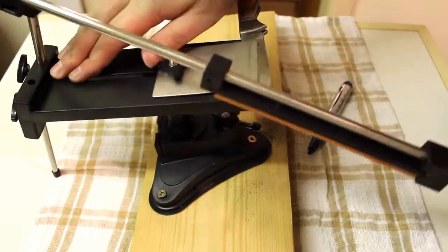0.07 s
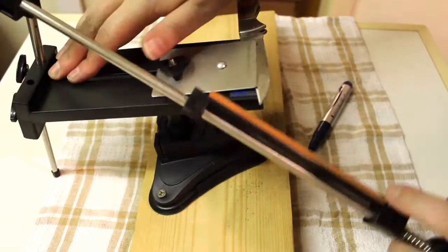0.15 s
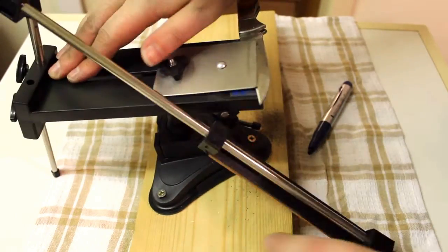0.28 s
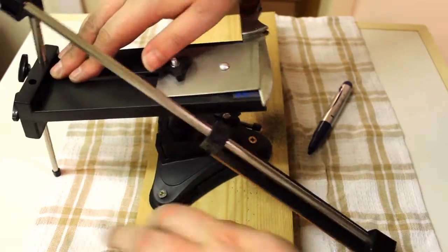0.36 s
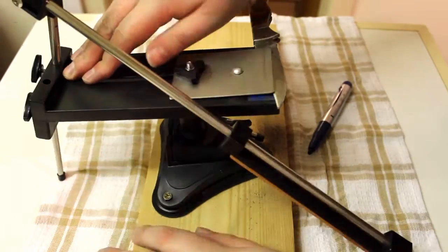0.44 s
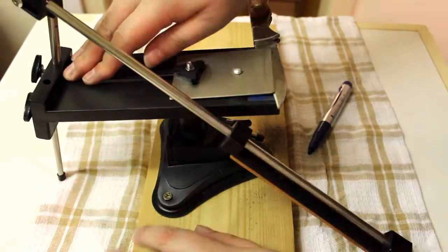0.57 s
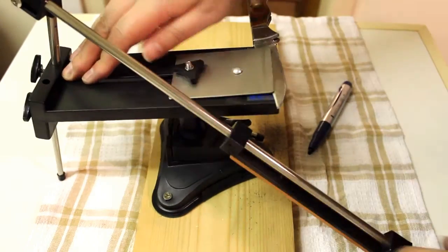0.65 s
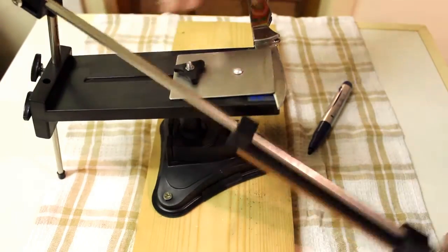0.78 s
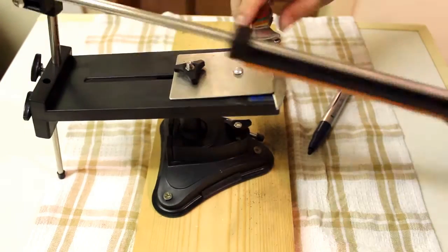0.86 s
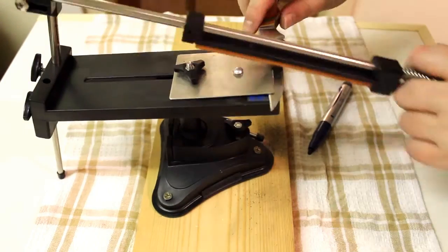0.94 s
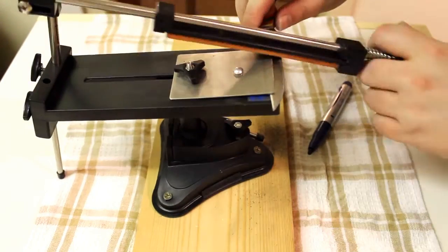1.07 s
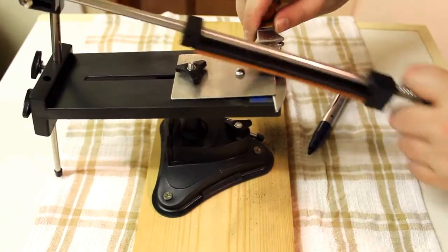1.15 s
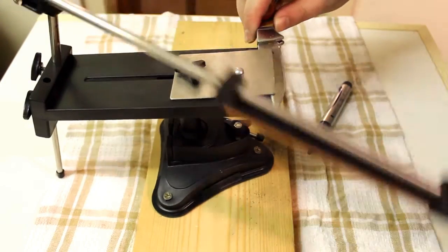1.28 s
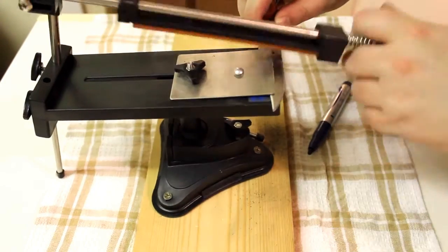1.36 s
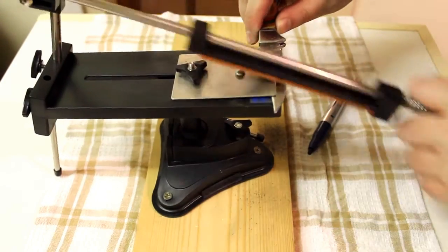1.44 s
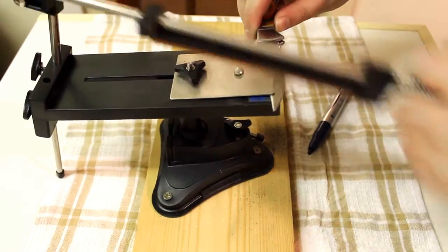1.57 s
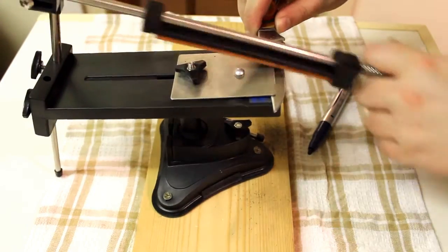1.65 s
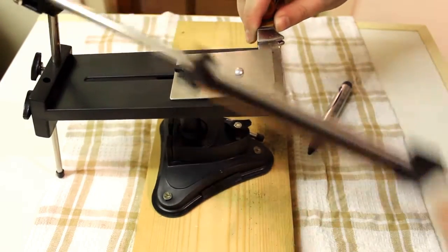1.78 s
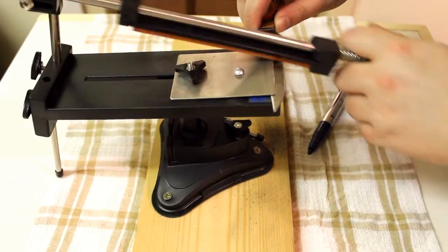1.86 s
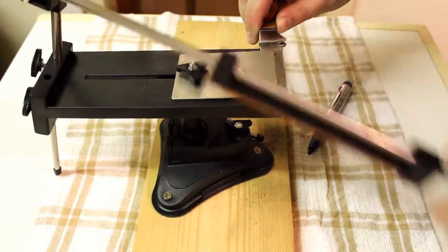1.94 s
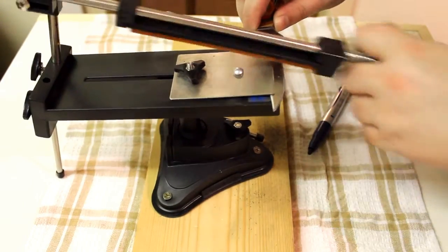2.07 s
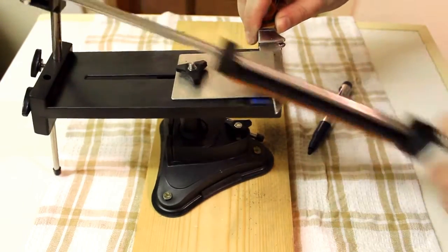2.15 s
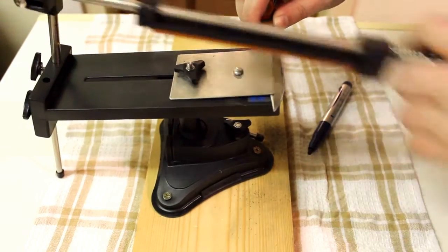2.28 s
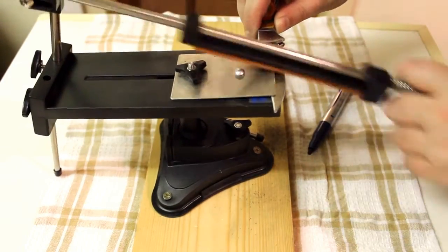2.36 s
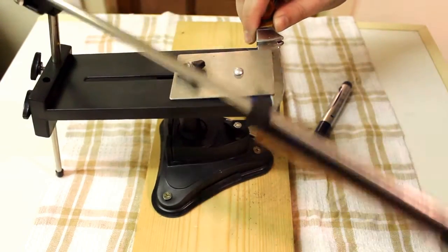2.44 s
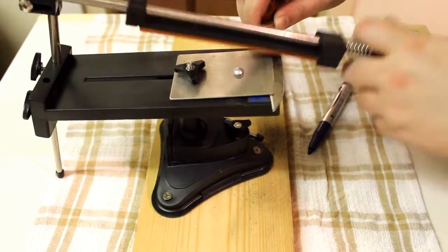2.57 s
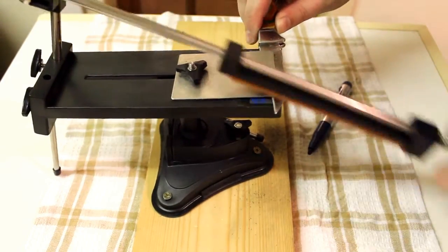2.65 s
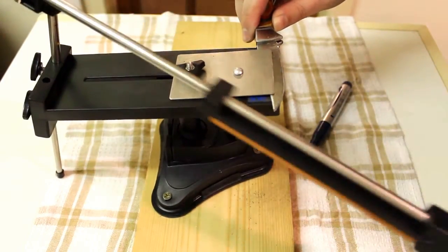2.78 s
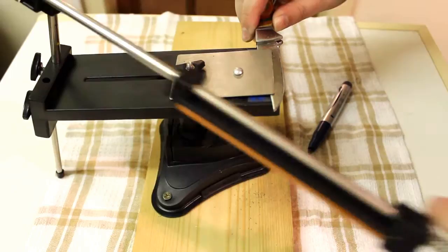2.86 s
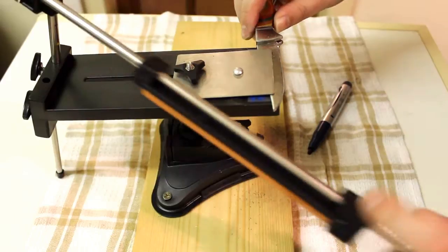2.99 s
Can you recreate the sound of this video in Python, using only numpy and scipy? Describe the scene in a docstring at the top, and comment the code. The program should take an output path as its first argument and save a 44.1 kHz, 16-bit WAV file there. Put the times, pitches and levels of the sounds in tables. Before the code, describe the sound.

Stone scraping on a knife, heard close in a small room, sped up over a faint steady hum around 600 Hz. Light knocks from 0.1 s, a very loud dry clack at 0.28 s, a tick at 0.47 s, then near quiet. From 0.84 s quick hissing strokes, about nine a second, grow stronger with bright ticks and faint squeaky groans. At 2.75 s a slower, duller rasp fades; the hum drops low.

```python
"""Stone dragged along a clamped knife

A stone on a guide rod is dragged to and fro along a clamped knife in a small room, over a steady hum.
Blows excite decaying modes of blade, rod, stand and plate; grit is a train of random grains; the rod
groans as a tone with its octave; the appliance hum is sines, sounded at four times their frequencies.
Near the end a cross-fade leads to normal speed: the hum drops two octaves, the scrape turns dull and slow."""
import sys
import numpy as np
from scipy import signal
from scipy.fft import rfft, irfft
from scipy.io import wavfile
from scipy.ndimage import uniform_filter1d

SR = 44100
rng = np.random.default_rng(int(sys.argv[2]) if len(sys.argv) > 2 else 0)


def to_linear_factor(level_db):
    """Convert decibel levels (scalar or array-like) to linear amplitude factors."""
    exponent = np.asarray(level_db, float) / 20
    return 10 ** exponent


def master(y):
    """Save y as 16-bit WAV."""
    cut = np.clip(np.atleast_2d(y).T, -1, 1)
    pcm = np.round(cut * 32767)  # scale
    wavfile.write(sys.argv[1], SR, pcm.astype(np.int16))


N = 134505
T = np.arange(N) / SR  # [s]

# modes of the stand: (frequency [Hz], relative level [dB])
STAND_MODES = [(225, 8.5), (470, -4), (705, -6), (915, -4.5), (1070, -5.5), (1320, -8.5)]
# modes of the guide rod: (frequency [Hz], relative level [dB])
ROD_MODES = [(2930, -1), (3500, 9), (3950, 16.5), (4400, 13), (5330, 5)]
ROD_T60 = 0.012  # [s]
# spectral density of the slow scrape and its room air: (frequency [Hz], relative density [dB per Hz])
SLOW_SPECTRUM = [(40, -11), (230, -1), (400, -11.5), (1500, -15.5), (3000, -2.5), (7500, -13), (9500, -33),
                 (14500, -45), (16000, -57)]
FAST_END_S = 2.799  # end of the fast part and of its last stroke


def evened(x):
    """Normalisation: scales a signal to rms 1."""
    return x / np.sqrt(np.mean(x ** 2) + 1e-20)


def read(points, hz):
    """Interpolation: reads a spectrum in dB along a logarithmic frequency axis."""
    f, value = np.transpose(points)
    return np.interp(np.log(hz + 1), np.log(f + 1), value)


def add(mix, s, sound):
    """Superposition: sums a sound into the mix from time s [s]."""
    part = mix[round(s * SR):][:len(sound)]
    part += sound[:len(part)]


def colour(x, spectrum):
    """Linear filtering: weights the Fourier spectrum by a curve in dB, then sets rms 1."""
    gain = to_linear_factor(read(spectrum, np.fft.rfftfreq(len(x), 1 / SR)))
    return evened(irfft(rfft(x) * gain, len(x)))


def filtered(x, order, hz, kind):
    """Linear filtering: passes a signal through a Butterworth filter."""
    return signal.sosfilt(signal.butter(order, hz, kind, fs=SR, output="sos"), x)


def wander(rate_hz):
    """Random modulation: low-passed Gaussian noise of rms 1."""
    return colour(rng.standard_normal(N), [(rate_hz, 0), (3 * rate_hz, -30), (30 * rate_hz, -90)])


def lasting(modes, t60):
    """Modal damping: gives every mode the same 60 dB decay time [s]."""
    return [(hz, db, t60) for hz, db in modes]


def ring(modes, scatter_db, detune, size=6000):
    """Modal impulse response: sums decaying sines, with random spread in level and relative pitch."""
    t = np.arange(size)[:, None] / SR
    hz, db, t60 = np.transpose(modes)
    level_chance, pitch_chance = rng.standard_normal((len(modes), 2)).T
    decay = to_linear_factor(db + scatter_db * level_chance - 60 * t / t60)
    return (decay * np.sin(2 * np.pi * hz * (1 + detune * pitch_chance) * t)).sum(1)


def resonated(x, modes):
    """Resonance: drives fixed modes with a signal by convolution, then sets rms 1."""
    return evened(signal.fftconvolve(x, ring(modes, 0, 0))[:N])


def grains(per_s, spread_db):
    """Shot noise: independent random impulses at a mean rate, of widely spread strength."""
    spread = to_linear_factor(spread_db * np.minimum(rng.exponential(1, N), 4))
    return rng.standard_normal(N) * spread * (rng.random(N) < per_s / SR)


def hum(speed, more_waver_db):
    """Amplitude modulation: steady sines, scaled in pitch by speed, waver randomly in level."""
    # lines at speed 1: (frequency [Hz], rms level without waver [dB], rms waver before the extra [dB])
    lines = [(47, -65, 1.5), (147.15, -41.8, 2.0), (153.4, -56, 1.5)]
    out = np.zeros(N)
    for hz, db, waver_db in lines:
        level = to_linear_factor(db + (waver_db + more_waver_db) * wander(17.0 * speed))
        out += np.sqrt(2) * level * np.sin(2 * np.pi * (hz * speed * T + rng.random()))
    return out


def room_air():
    """Broadband noise: Gaussian noise with a fixed spectral density."""
    # (frequency [Hz], relative density [dB per Hz])
    air_spectrum = [(30, -13), (250, -14.5), (500, 3), (1000, -5), (4000, -15.5), (15800, -22.5),
                    (16400, -56)]
    return to_linear_factor(-49) * colour(rng.standard_normal(N), air_spectrum)


def ticks():
    """Impact excitation: short rough contacts, with rattle and room wash, ring blade, rod and stand."""
    # rod knocks in its guide at each turn and when handled, with peaks before the rig's low cut:
    # (time [s], blade level [dB], rod level [dB], stand level [dB])
    knocks = [(0.1163, -29.5, -35, -32), (0.1704, -27, -31, -18.5), (0.216, -30, -17, -16.5),
              (0.2241, -14, -21.5, -49), (0.263, -39, -27, -17), (0.285, -10.5, -10, -45),
              (0.323, -26, -30, -48), (0.3448, -33, -22, -50), (0.4696, -5, -51, -17),
              (0.4726, -35, -16, -26), (0.8677, -44, -31.5, -38), (1.084, -19, -40, -41),
              (1.1768, -16.5, -30, -31), (1.3377, -8.5, -21, -24), (1.4698, -9, -24.5, -18.5),
              (1.4735, -14.5, -31, -17.5), (1.5869, -12.5, -49, -32), (1.7056, -13, -20.5, -14.5),
              (1.7094, -9, -38, -51), (1.8268, -12.5, -21, -20.5), (1.9318, -17, -24, -24),
              (1.9394, -15, -59, -30), (2.0493, -18, -21, -24), (2.1548, -18, -20.5, -24),
              (2.1767, -26, -26.5, -47), (2.2491, -21, -25.5, -25), (2.2791, -13, -40, -50),
              (2.412, -19, -21.5, -15.5), (2.4171, -10.5, -33, -28), (2.5322, -12.5, -36, -27),
              (2.6581, -17, -22.5, -16.5), (2.663, -11.5, -61, -22.5), (2.7851, -7.5, -35, -19.5)]
    # (frequency [Hz], relative level [dB])
    blade_modes = [(7900, 1.6), (9300, 2.5), (10700, 11.3), (11900, 12), (14200, 6)]
    parts = lasting(blade_modes, 0.0029), lasting(ROD_MODES, ROD_T60), lasting(STAND_MODES, 0.023)
    rise_s, contact_s = 0.00015, 0.0007  # exponential time constants
    rattle_db, rattle_t60, wash_db, wash_t60 = -17.5, 0.052, -22, 0.18  # decay times [s]
    out, t = np.zeros(N), np.arange(7000) / SR
    rattle = to_linear_factor(rattle_db - 60 * t / rattle_t60)
    wash = to_linear_factor(wash_db - 60 * t / wash_t60)
    shape = (1 - np.exp(-t / rise_s)) * (np.exp(-t / contact_s) + rattle + wash)
    for s, *parts_db in knocks:
        touch = rng.standard_normal(len(t)) * shape
        for db, modes in zip(parts_db, parts):
            rung = signal.fftconvolve(touch, ring(modes, 2, 0.025, size=1500))
            add(out, s, to_linear_factor(db) * rung / abs(rung).max())
    return out


def clack():
    """Impulse response: the dropped rod's clean blow, its rattle and the room's wash ring the clamp plate."""
    # (frequency [Hz], relative level [dB], 60 dB decay time [s])
    plate_modes = [(964, -22, 0.15), (1117, 5.5, 0.013), (1745, -21, 0.18), (2120, -4.5, 0.023),
                   (1250, 1.5, 0.011), (1700, 10.5, 0.0038), (2750, 9.5, 0.0059), (3430, 8.5, 0.0058),
                   (4070, 0.5, 0.024), (5010, 4.5, 0.013)]
    start_s, peak_db = .2833, 2.2  # peak before the rig's low cut
    rattle_db, rattle_s, wash_db, wash_s = -20.5, 0.0055, -27.5, 0.032  # time constants [s]
    out, t = np.zeros(N), np.arange(9000) / SR
    after = to_linear_factor(rattle_db) * np.exp(-t / rattle_s) + to_linear_factor(wash_db) * np.exp(-t / wash_s)
    blow = after * rng.standard_normal(len(t)) + signal.unit_impulse(len(t))
    rung = signal.fftconvolve(blow, ring(plate_modes, 0, 0, size=9000))
    add(out, start_s, -to_linear_factor(peak_db) * rung / abs(rung).max())
    return out


def scrape():
    """Friction excitation: grit hisses off the edge; drag, peaking past mid-stroke, shakes rod and stand."""
    # strokes, each lasting to the next; levels before the rig's low cut:
    # (time [s], grit at start [dB], grit at end [dB], rod drag at the peak of its arch [dB])
    strokes = [(.84, -44.5, -68, -69), (0.945, -44.5, -62, -58), (1.03, -58, -37, -52.5),
               (1.099, -63, -44.5, -54.5), (1.2, -55.5, -40.5, -50), (1.349, -49, -55, -52.5),
               (1.49, -54.5, -37, -50), (1.599, -49.5, -51, -57), (1.732, -49.5, -42.5, -45.5),
               (1.84, -44.5, -57, -53), (1.949, -52, -39, -44), (2.061, -50.5, -42.5, -56),
               (2.171, -47, -35.5, -45), (2.286, -44, -57.5, -51), (2.43, -49.5, -40, -44.5),
               (2.54, -42, -58.5, -53), (2.67, -47.5, -40, -45)]
    # (frequency [Hz], relative density [dB per Hz])
    grit_spectrum = [(1500, -7.5), (2500, -10.5), (4000, -6.5), (7500, -10), (10900, -6.5), (15700, -8),
                     (16300, -54)]
    arch_db, stand_over_rod_db, flutter_db, shake_t60 = 16, 11.5, 1, 0.054  # decay time [s]
    s, start_db, end_db, drag_db = np.transpose(strokes)
    k = np.maximum(np.searchsorted(s, T) - 1, 0)  # stroke in progress
    progress = np.clip((T - s[k]) / np.diff(np.append(s, FAST_END_S))[k], 0, 1)
    grit_db = uniform_filter1d(start_db[k] + (end_db - start_db)[k] * progress ** 1.2, size=400)
    arch = np.sin(np.pi * progress ** 1.19) - 1
    pull_db = uniform_filter1d(drag_db[k] + arch_db * arch, size=600)
    grit = colour(grains(7500, 3.5), grit_spectrum)
    rod = resonated(grains(4000, 3.4) * to_linear_factor(3.8 * wander(23)), lasting(ROD_MODES, ROD_T60))
    stand = np.zeros(N)
    for mode in lasting(STAND_MODES, shake_t60):
        shake = rng.standard_normal(N) * to_linear_factor(flutter_db * wander(6.9))
        stand += signal.fftconvolve(shake, ring([mode], 0, 0))[:N]
    drag = rod + to_linear_factor(stand_over_rod_db) * evened(stand)
    return (T > s[0]) * (to_linear_factor(grit_db) * grit + to_linear_factor(pull_db) * drag)


def groans():
    """Frequency modulation: the rod groans in its guide as Gaussian swells of an unsteady tone and octave."""
    # (time of the crest [s], mean frequency [Hz], fundamental's crest amplitude without waver [dB])
    swells = [(0.968, 522, -46), (1.428, 464, -43.5), (1.686, 465, -45.5), (1.8, 522, -45.5),
              (2.025, 530, -44.5), (2.137, 489, -39.5), (2.245, 491.4, -41), (2.6, 495, -46)]
    width_s, waver_db, octave_db = 0.021, 6.5, -3  # width is the standard deviation
    turns = 2 * np.pi * np.cumsum(1 + 0.05 * wander(90)) / SR  # phase per Hz [rad]
    low, high = (to_linear_factor(waver_db * wander(35)) for _ in range(2))
    out = np.zeros(N)
    for s, hz, db in swells:
        swell = to_linear_factor(db) * np.exp(-.5 * ((T - s) / width_s) ** 2)
        octave = to_linear_factor(octave_db) * high * np.sin(2 * hz * turns)
        out += swell * (low * np.sin(hz * turns) + octave)
    return out


def slow_stroke():
    """Band-split friction noise: low grit rings as a rasp while high grit hisses, each with its envelope."""
    # (time [s], rasp rms level [dB], hiss rms level [dB])
    envelope = [(2.751, -30.5, -37.5), (2.81, -39, -45), (2.97, -48.5, -46), (3.0, -56.5, -47)]
    # (frequency [Hz], relative level [dB])
    rasp_modes = [(1970, 2), (2690, 6), (3440, 3), (4330, 0)]
    s, rasp_db, hiss_db = np.transpose(envelope)
    grit = colour(grains(14000, 2.1), SLOW_SPECTRUM)
    low = filtered(grit, 3, [1500, 5200], "band")
    hiss = evened(filtered(grit, 3, 5200, "high"))
    rings = resonated(low, lasting(rasp_modes, 0.033))
    rasp = evened(evened(low) + to_linear_factor(-5.5) * rings)
    return to_linear_factor(np.interp(T, s, rasp_db)) * rasp + to_linear_factor(np.interp(T, s, hiss_db)) * hiss


def slow_air():
    """Broadband noise: coloured Gaussian noise limited to a low band."""
    noise = colour(rng.standard_normal(N), SLOW_SPECTRUM)
    return to_linear_factor(-47) * evened(filtered(noise, 3, [30, 1600], "band"))


def slow_part():
    """Superposition: at normal speed, one long rasping stroke, room air and the low hum."""
    return slow_stroke() + slow_air() + to_linear_factor(-2) * hum(1, -2.8)


def scene():
    """Superposition and cross-fade: the fast layers, then the slow part."""
    speed, slow_in_s, slow_fade_s, fast_fade_s = 4, 2.751, 0.00043, .012
    # the small rig radiates little bass
    rig = filtered(ticks() + clack() + scrape(), 2, 660, "high")
    fast = rig + groans() + hum(speed, 0) + room_air()
    fade_out = np.clip((FAST_END_S - T) / fast_fade_s, 0, 1)
    fade_in = np.clip((T - slow_in_s) / slow_fade_s, 0, 1)
    return (fast * fade_out + slow_part() * fade_in)[None]


def band_limit(x):
    """A steep low-pass at the top of the band."""
    return signal.sosfilt(signal.butter(12, 16970, fs=SR, output="sos"), x)


def record(dry):
    """Clipping: limits the mix to full scale."""
    mix = np.clip(dry, -1, 1)
    return band_limit(mix)


dry = scene()
out = record(dry)
master(out)
```